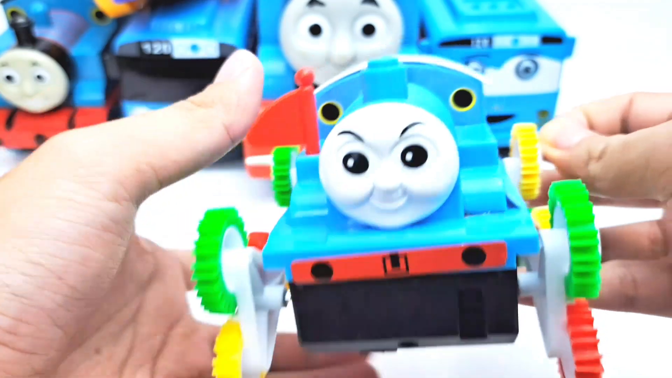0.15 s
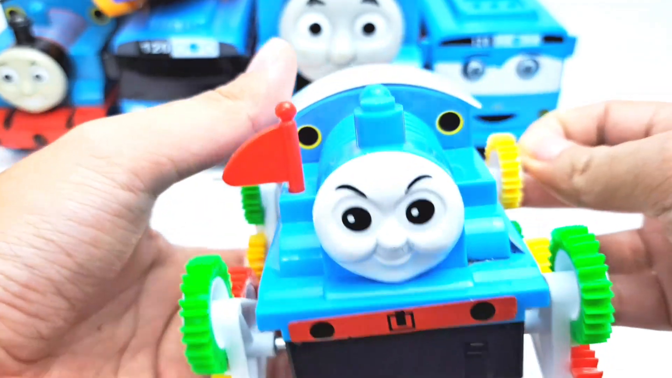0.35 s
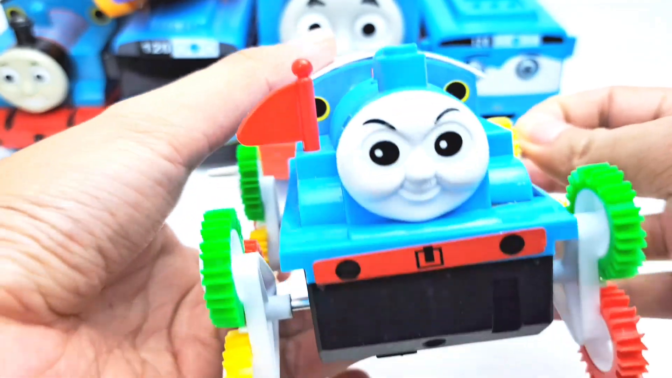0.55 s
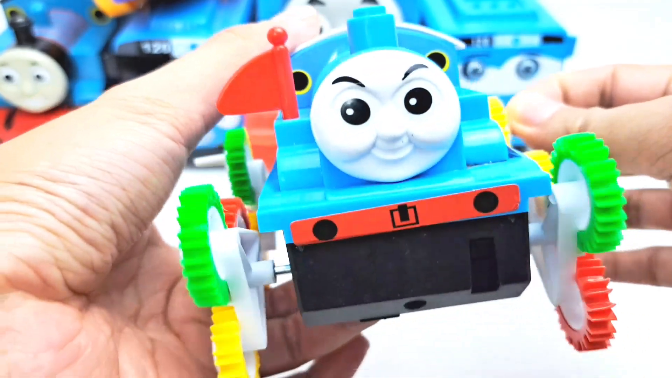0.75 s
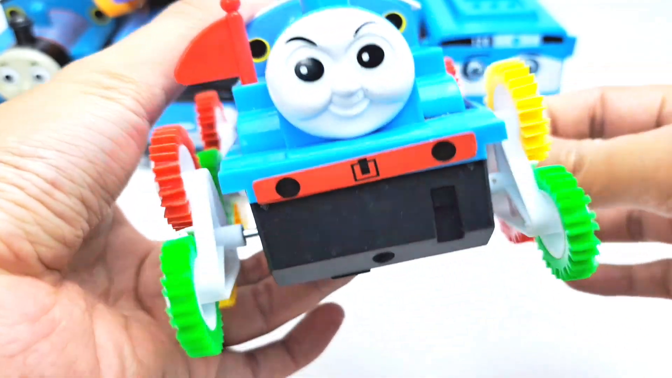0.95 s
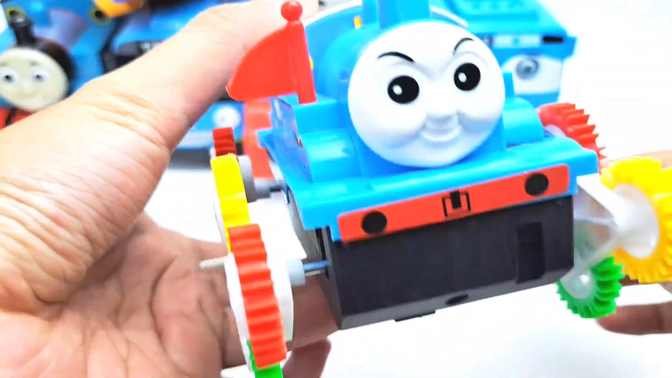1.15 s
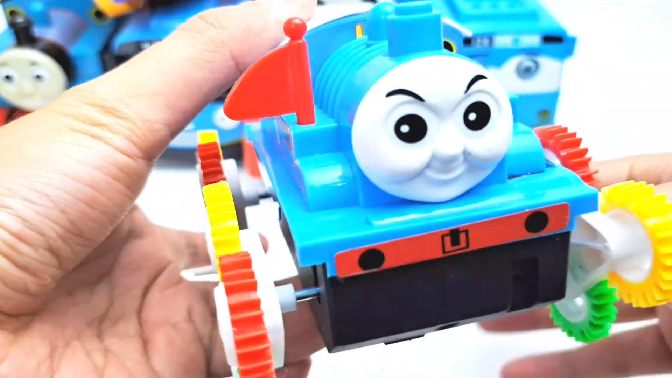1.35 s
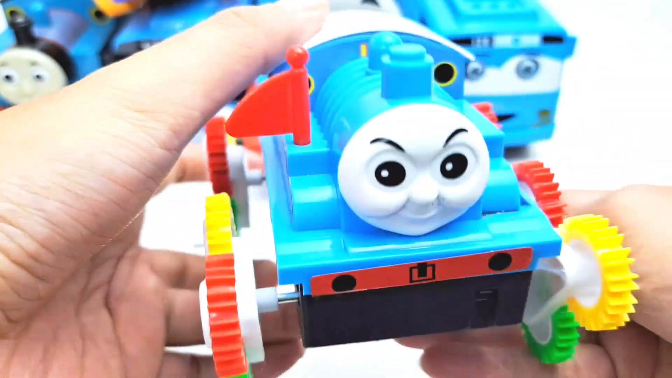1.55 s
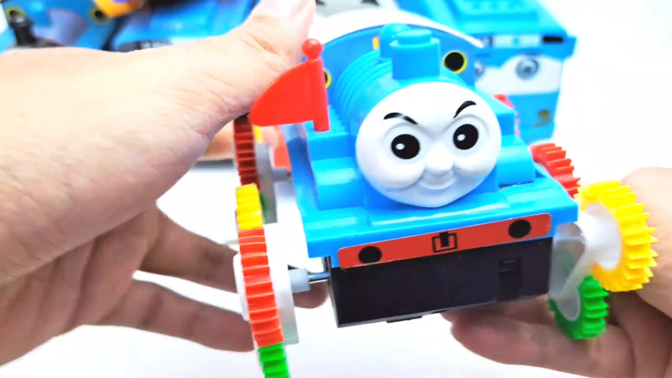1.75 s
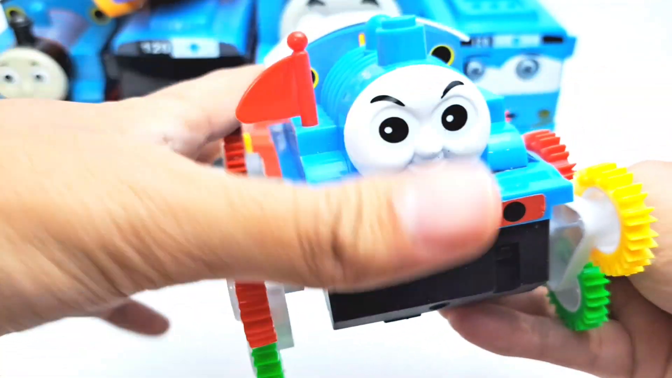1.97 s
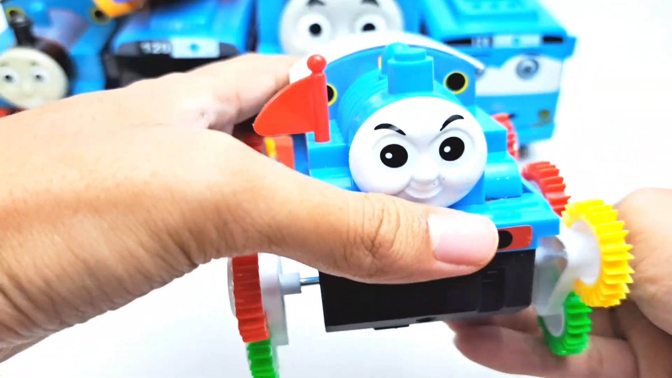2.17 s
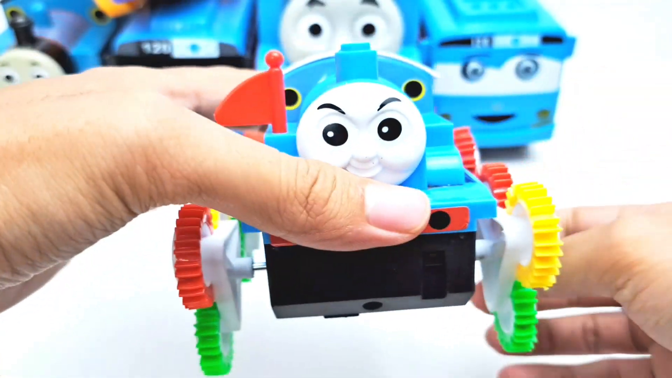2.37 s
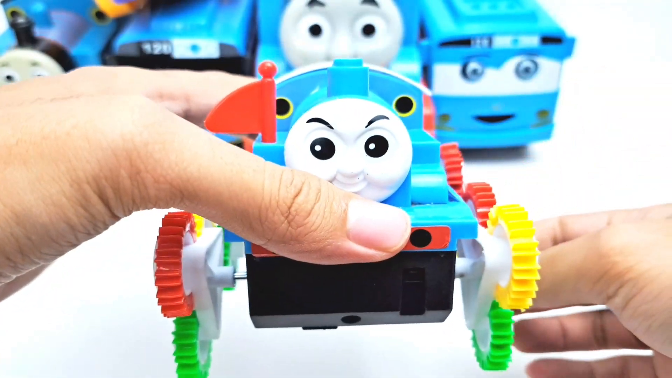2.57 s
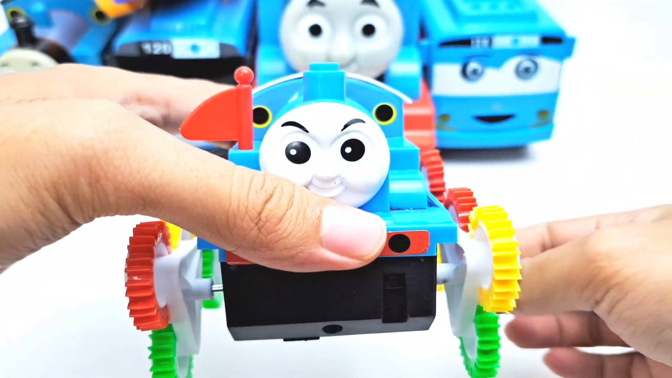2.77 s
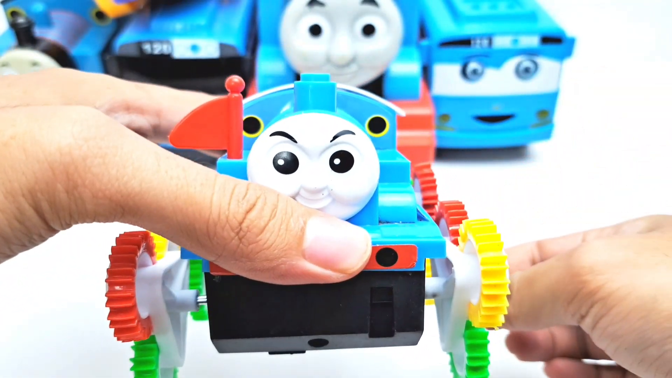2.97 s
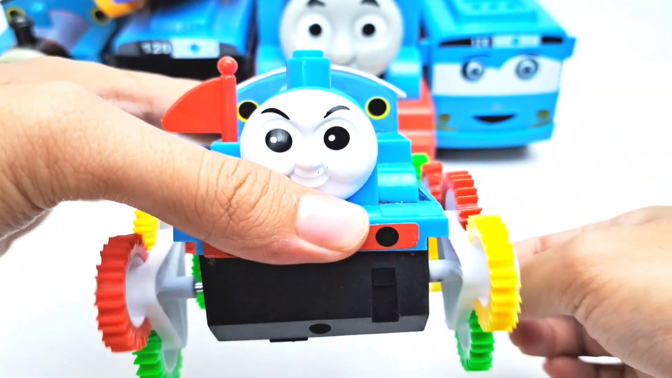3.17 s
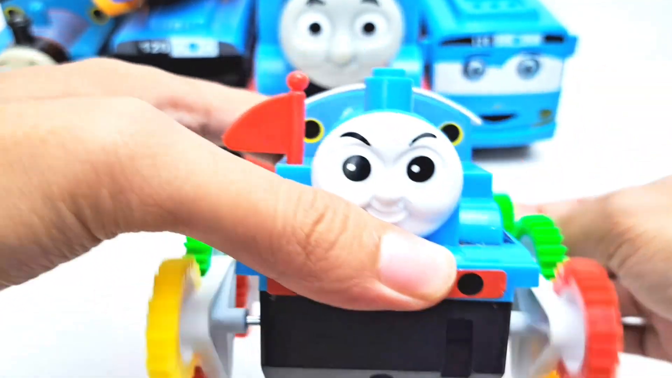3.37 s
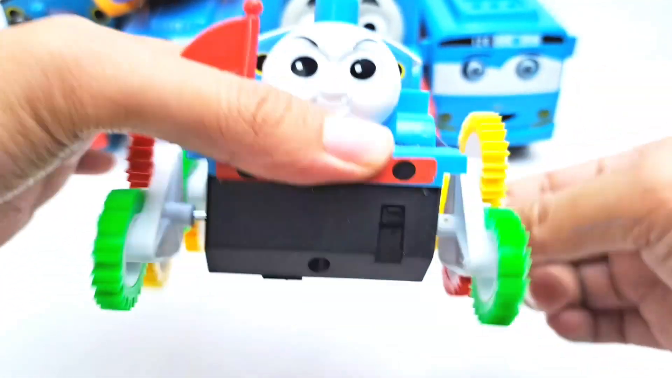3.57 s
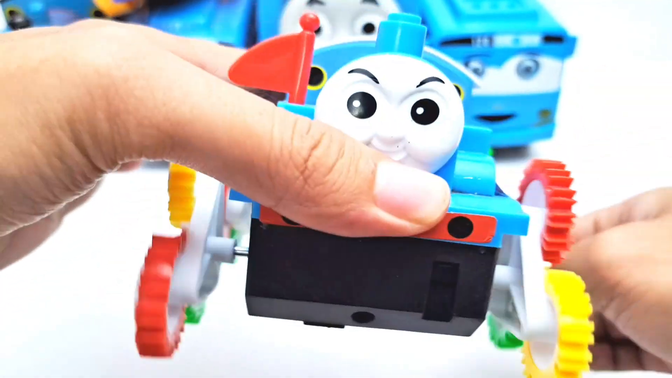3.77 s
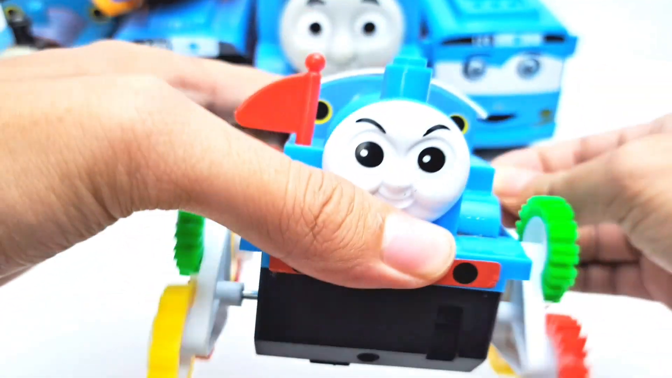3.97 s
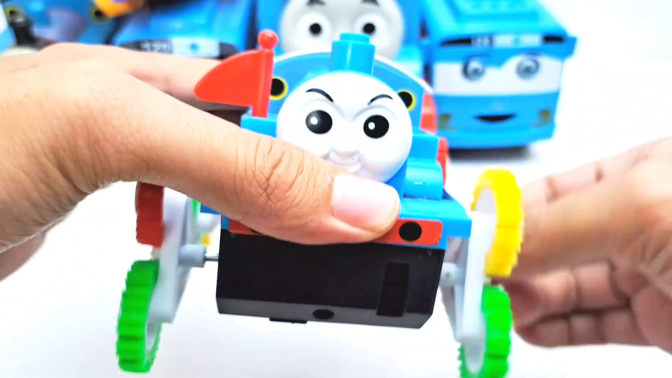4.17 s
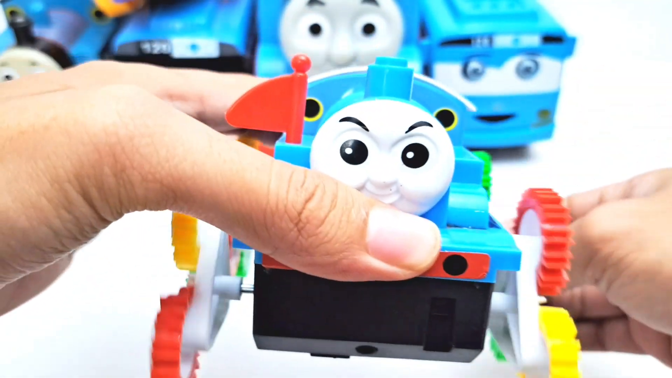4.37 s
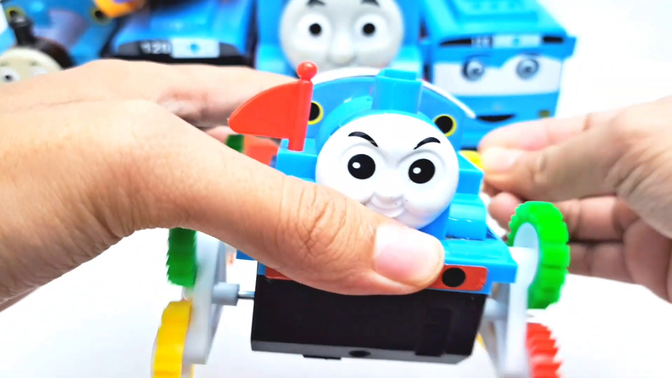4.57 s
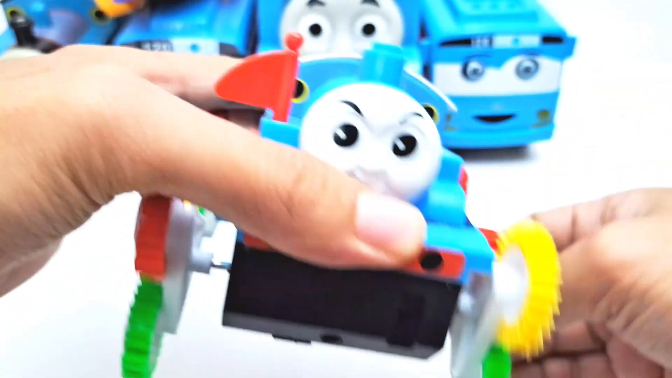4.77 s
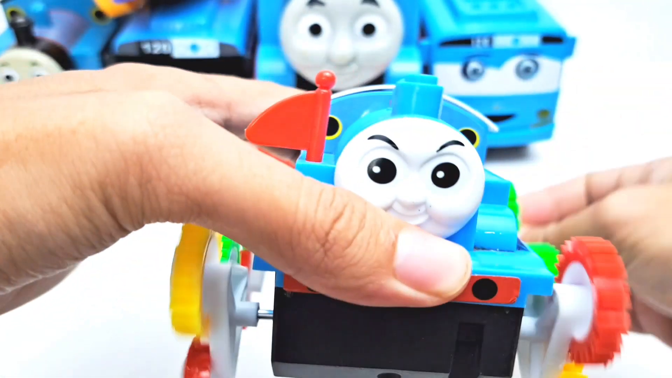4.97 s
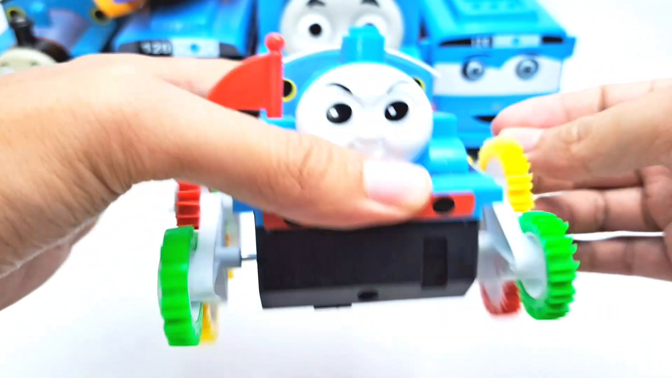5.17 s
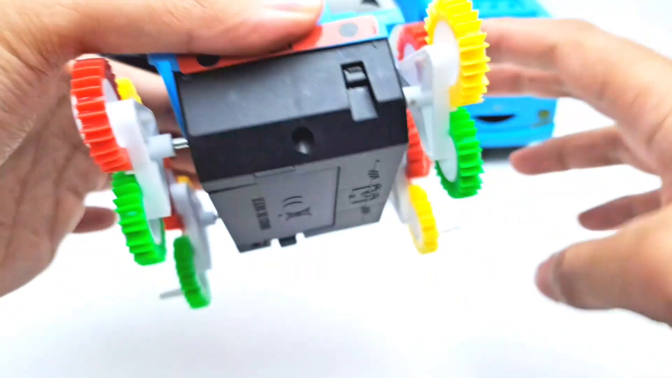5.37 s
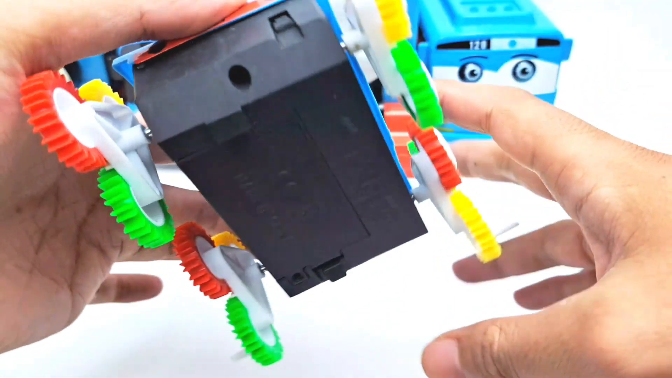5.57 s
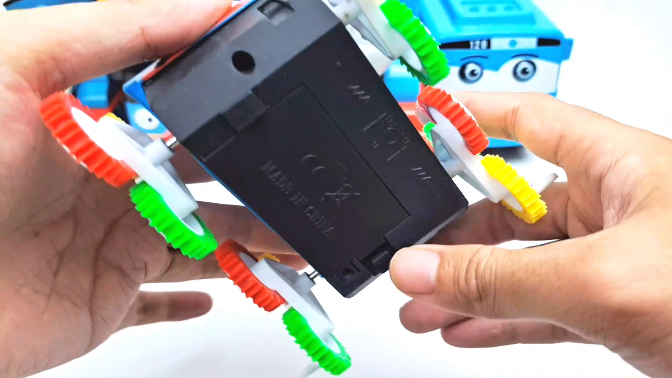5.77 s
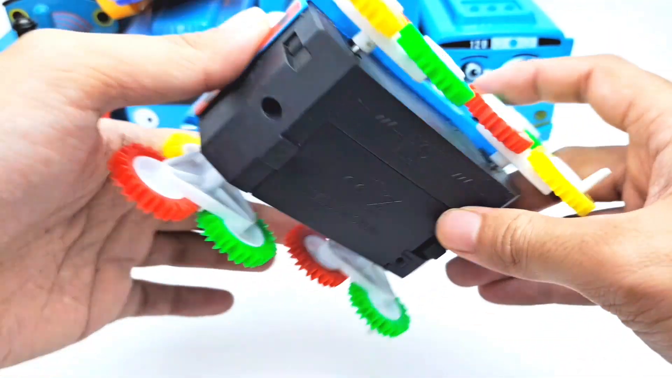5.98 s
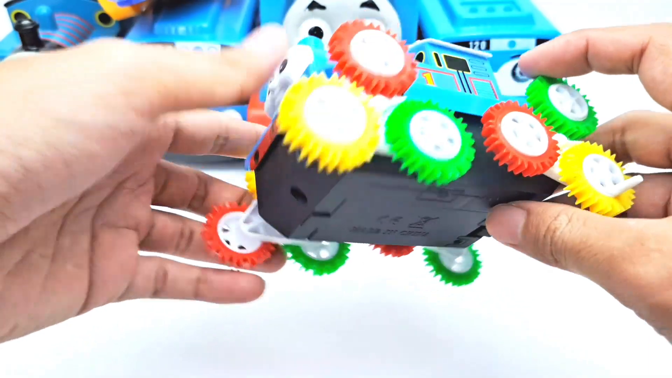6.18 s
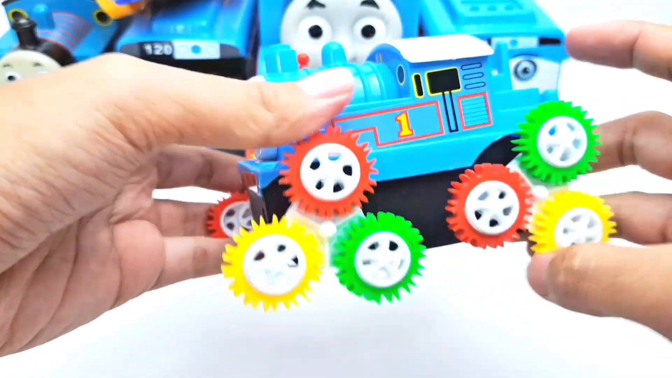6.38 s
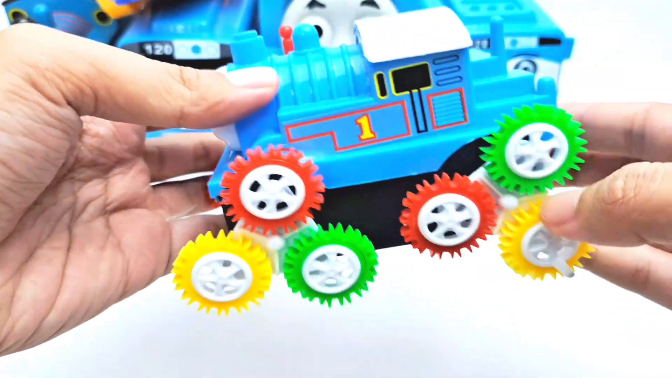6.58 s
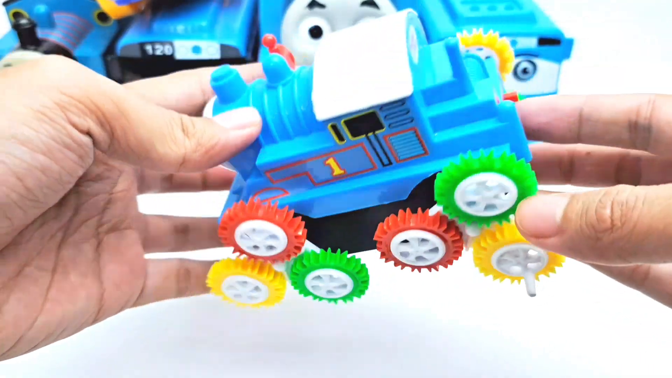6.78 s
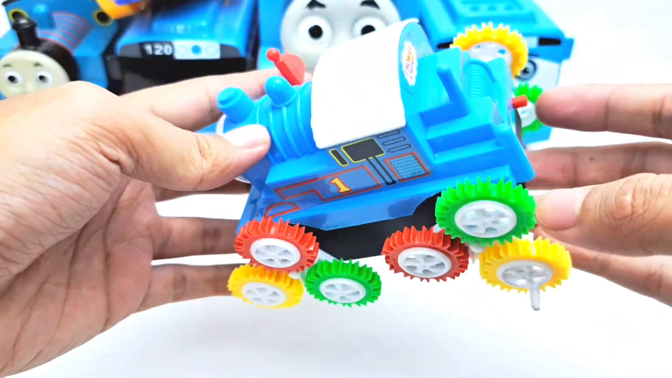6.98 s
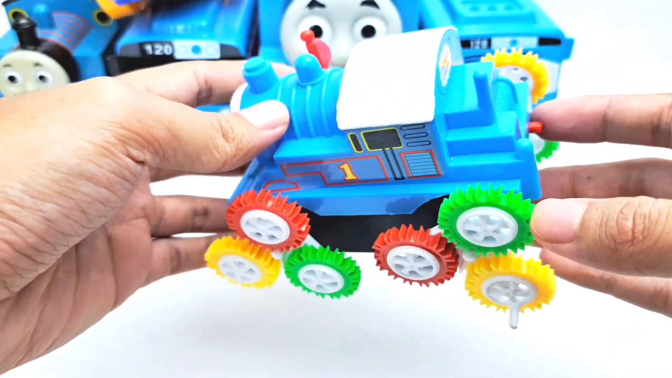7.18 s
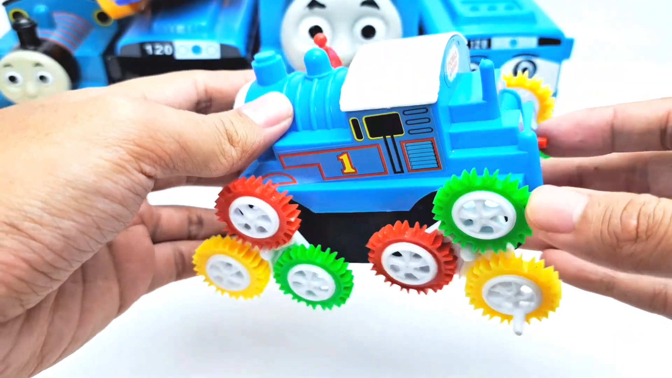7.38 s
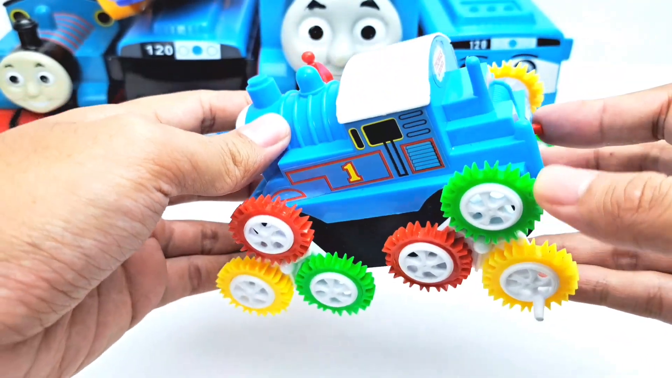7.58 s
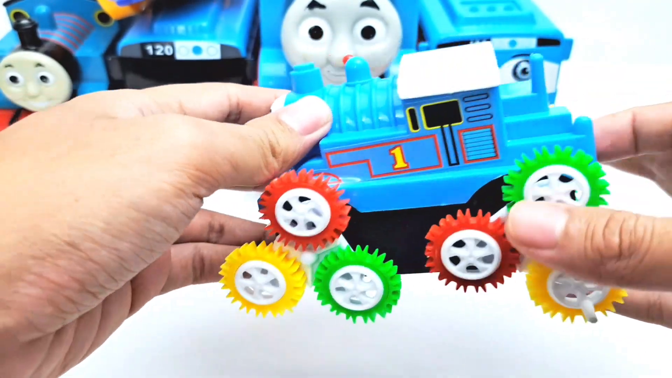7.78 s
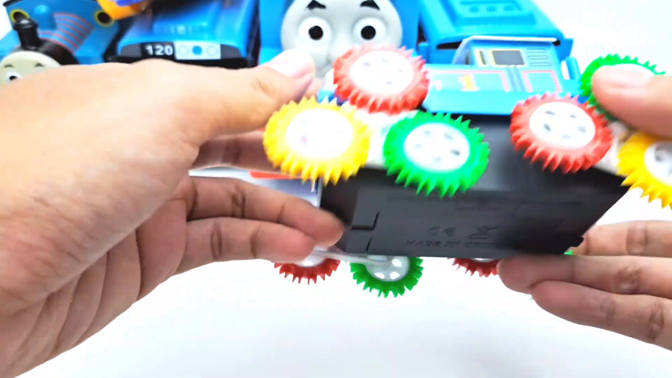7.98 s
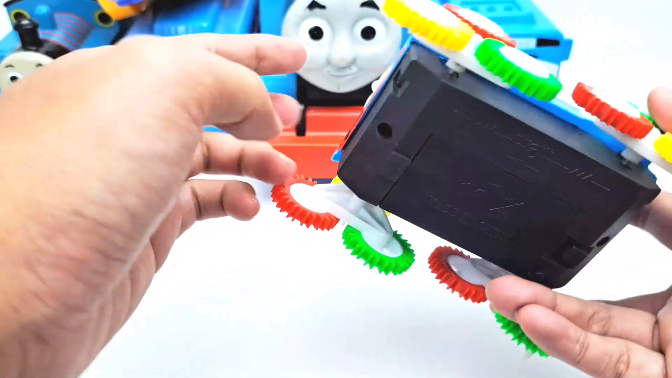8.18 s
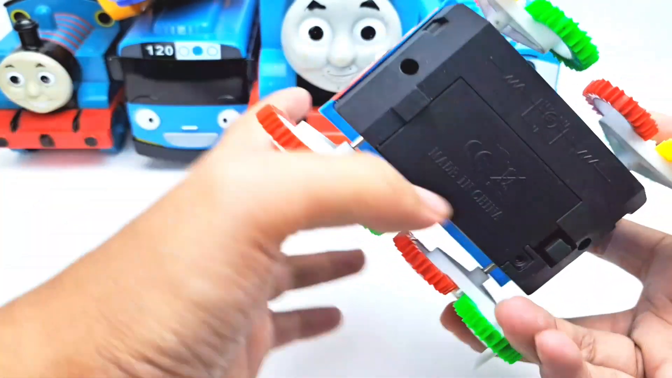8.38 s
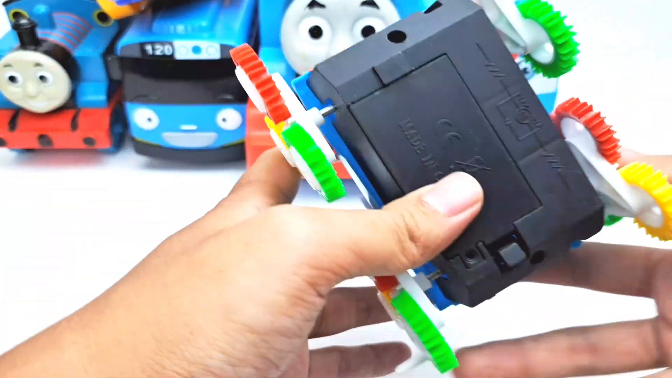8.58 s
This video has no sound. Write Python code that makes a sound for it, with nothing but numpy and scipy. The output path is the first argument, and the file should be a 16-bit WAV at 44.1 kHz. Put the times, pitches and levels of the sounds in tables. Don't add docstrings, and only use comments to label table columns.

```python
import sys
import numpy as np
from scipy import signal
from scipy.fft import rfft, irfft, next_fast_len
from scipy.io import wavfile
from scipy.ndimage import uniform_filter1d

SR = 44100
rng = np.random.default_rng(int(sys.argv[2]) if len(sys.argv) > 2 else 0)


def store_wav(level_fs):
    pcm = np.round(np.clip(np.atleast_2d(level_fs), -1, 1) * 32767)
    wavfile.write(sys.argv[1], SR, pcm.T.astype(np.int16))


def volts_from_decibels(level):
    exponent = np.asarray(level, float) / 20
    return 10 ** exponent


N = 380891
STEP = 64
FIRST_TURN_S = 1.3

# f/Hz, width/Hz, level/dB, left minus right/dB
SHELL = [(600, 380, -22.5, 0), (719, 50, -11.5, -1.5), (860, 90, -17.5, -2), (1080, 33, 3, -2),
         (1250, 13, -24, -0.5), (1546.5, 170, -3, -7), (1700, 60, -9, -2), (1830, 94, 0.5, 3.5),
         (2100, 120, -4.5, -3), (2271, 55, 4.5, -5.5), (2524, 420, -6.5, 1), (3397, 680, -14, -4),
         (4044, 380, -9.5, -5.5), (4434, 350, -5.5, -3.5), (4814, 270, -7.5, -1), (5620, 330, -16.5, 0.5),
         (6530, 550, -12, -2), (7430, 770, -15.5, 0), (12370, 3600, -29, 4)]
# f/Hz, level per Hz/dB
SKIN = [(500, -21), (1000, 7.5), (2200, 9), (3000, 0.5), (6000, 1), (9000, -11.5), (14000, -16),
        (16000, -17)]


def unit(x):
    return x / np.sqrt(np.mean(x ** 2))


def even(x):
    return x / np.sqrt(uniform_filter1d(np.mean(x ** 2, axis=0), size=5000))


def colour(x, points):
    hz, db = np.transpose(points)
    length = x.shape[-1]
    size = next_fast_len(length)
    f = np.maximum(np.arange(size // 2 + 1) * SR / size, 1)
    gain = volts_from_decibels(np.interp(np.log(f), np.log(hz), db))
    return irfft(rfft(x, size) * gain, size)[..., :length]


def split(x):
    lows = []
    for hz in (1300, 2000, 3000):
        lowpass = signal.butter(4, hz, fs=SR, output="sos")
        lows.append(signal.sosfiltfilt(lowpass, x))
    a, b, c = lows
    return unit(a), unit(b - a), unit(c - b), unit(x - c)


def resonance(hz, width):
    return np.exp((2j * np.pi * hz - np.pi * width) / SR)


def sides(pan_db):
    return volts_from_decibels(np.array([pan_db, -pan_db]) / 2)


def walk(rate):
    k = int(SR / rate)
    held = np.repeat(rng.standard_normal(N // k + 1), k)
    return unit(uniform_filter1d(held, k)[:N])


def grit(rate, spread_db):
    hit = rng.random((3, N)) < rate / SR
    size = np.minimum(rng.exponential(size=(3, N)), 3)
    return unit(hit * rng.standard_normal((3, N)) * volts_from_decibels(spread_db * size))


def stretch(control):
    return np.interp(np.arange(N) / STEP, np.arange(len(control)), control)


def ramp(start, end, rise_db_s, fall_db_s):
    t = np.arange(N // STEP + 1) * STEP / SR
    return -rise_db_s * np.maximum(start - t, 0) - fall_db_s * np.maximum(t - end, 0)


def spin():
    # grip t/s, full speed t/s, let go t/s, level at grip/dB, level at full speed/dB
    pushes = [
        (0.848, 1.119, 1.1905, -51.5, -32),
        (3.297, 3.418, 3.848, -41.5, -28.5),
        (3.799, 4.066, 4.236, -36, -27.5),
        (4.334, 4.68, 4.843, -34.5, -27.5),
        (4.927, 5.152, 5.318, -34.5, -27),
        (5.458, 5.5, 5.6, -46, -49.5),
    ]
    stopped = (True, False, False, False, False, True)
    grip_db_s, coast_db_s, stop_db_s = 400, 85, 352
    t = np.arange(N // STEP + 1) * STEP / SR
    levels = []
    for (grip, full, off, grip_db, full_db), stop in zip(pushes, stopped):
        speed_up = np.interp(t, [grip, full], [grip_db, full_db])
        levels.append(speed_up + ramp(grip, off, grip_db_s, stop_db_s if stop else coast_db_s))
    levels = np.array(levels)
    grip, off = np.transpose(pushes)[[0, 2]][:, levels.argmax(axis=0)]
    levels[:-1] += ramp(0, pushes[-1][2], 0, stop_db_s)
    done = uniform_filter1d(np.clip((t - grip) / (off - grip), 0, 1), size=40)
    return stretch(levels.max(axis=0)), stretch(done)


def shell(force, patchy_db):
    like_sides = [.7, .9, .9, .6, .6, .6, .9, 1, .7, 1, .7, .6, .1, .7, .5, .4, .2, .5, .2]
    left_lead = [.6, .2, .3, -.8, -.1, .1, -2.4, -1.6, 1.4, 1.2, -1.4, 2.6, -.9, 1.2, 2.1, .2, -2.9, 1.7,
                 -.2]
    drift, squeeze = 0.012, 0.02
    out, done = np.zeros((2, N)), spin()[1]
    for (hz, width, db, pan_db), like, lead in zip(SHELL, like_sides, left_lead):
        drive = np.sqrt(like) * force[0] + np.sqrt(1 - like) * force[1:]
        ring = signal.lfilter([1], [1, -resonance(hz, width)], drive)
        bend = (hz > 1300) * (drift * walk(12) + squeeze * (done - 0.5))
        ring *= np.exp(2j * np.pi * hz / SR * np.cumsum(bend))
        ring *= np.exp(1j * np.array([[lead], [0]]))
        level = volts_from_decibels(db + patchy_db * walk(22)) * np.sqrt(width)
        out += level * unit(ring.imag) * sides(pan_db)[:, None]
    return unit(out)


def chatter():
    # t/s, surge level/dB
    catches = [(0.897, 3), (1.029, 3), (1.092, 2.6), (1.129, 9.5), (1.184, 7), (3.268, 0.3), (3.305, 1),
               (3.354, 3.5), (3.399, 1.5), (3.432, -1.5), (3.479, 0.4), (3.503, 0.3), (3.558, 0),
               (3.599, -0.4), (3.673, -1.2), (3.685, 1.7), (3.7, 3), (3.73, 1.5), (3.782, -2),
               (3.842, -0.5), (3.877, 3.5), (3.945, 2.2), (3.986, 2.1), (4.025, -0.4), (4.064, 2),
               (4.086, -1), (4.127, 0.8), (4.245, 4), (4.272, -0.2), (4.3, 0), (4.347, 2.5), (4.393, 2.5),
               (4.438, 1), (4.482, 6), (4.531, 1), (4.615, 1.4), (4.683, 2.5), (4.703, -5), (4.736, 3.1),
               (4.778, 2), (4.834, -2.5), (4.852, 2), (4.897, 6), (4.92, -0.3), (4.949, 4), (5.03, -1.7),
               (5.109, 3.2), (5.134, 0), (5.158, 0), (5.2, 0.5), (5.215, 1), (5.243, 3.5), (5.312, 2.5),
               (5.36, 3.5), (5.38, 4.5), (5.41, -1.2), (5.472, 1), (5.487, -2), (5.507, 1), (5.542, 2),
               (5.564, 2.5)]
    gaps = [3.322, 3.379, 3.421, 3.72, 3.922, 4.267, 4.316, 4.362, 4.472, 4.82, 4.877, 4.933, 4.972, 5.405]
    # f/Hz, level per Hz/dB
    rattle_tone = [(300, -55), (600, -21.5), (900, 1.5), (1600, -0.5), (2300, 5.5), (3100, -2.5),
                   (4500, -9.5), (7500, -17), (9800, -39), (13000, -23.5), (14300, -31.5), (15500, -41.5)]
    surge = np.zeros(N)
    for s, db in catches:
        surge[int(s * SR)] = volts_from_decibels(db + 5.5)
    t = np.arange(2048) / SR
    catch_shape = (1 - np.exp(-t / 0.0047)) * np.exp(-t / 0.0052)
    surge = signal.fftconvolve(surge, catch_shape)[:N]
    control_t = np.arange(N)[::STEP] / SR
    slack = 1 - 0.55 * sum(np.exp(-((control_t - s) / 0.0065) ** 2) for s in gaps)
    unsteady = volts_from_decibels(0.6 * walk(45) + 1.6 * walk(260))
    force = stretch(slack) * grit(7000, 1.5) * unsteady * (1 + surge)
    rattle = unit(colour(force[1:] + 0.1 * force[0], rattle_tone))
    rattle_db = np.where(np.arange(N) < FIRST_TURN_S * SR, 1, -7)
    return [even(part) for part in split(shell(force, 3.3) + volts_from_decibels(rattle_db) * rattle)]


def gears(deep, middle, upper, bright):
    db, done = spin()
    palm = np.arange(N) < FIRST_TURN_S * SR
    deep_db = -7 + (-11.5 + 7) * done + 8 * palm
    upper_db = 2 + (-13 - 2) * done - 0.5 + 2 * palm * (1.5 - done)
    bright_db = 5 + (-1 - 5) * done + 3 * palm
    deep_db += 0.35 * np.clip(db + 29, -6, 0)
    bright_db += 0.19 * np.minimum(db + 33.5, 0)
    parts = middle + volts_from_decibels(deep_db) * deep + volts_from_decibels(upper_db) * upper + volts_from_decibels(bright_db) * bright
    shaded = colour(parts, [(7000, -1), (8800, -0.5)])
    return volts_from_decibels(db + 1.0) * sides(-2.5)[:, None] * shaded


def whine():
    # start t/s, end t/s, start f/Hz, end f/Hz, level/dB
    glides = [(1.09, 1.158, 2080, 2170, -29.5), (3.33, 3.428, 2250, 2660, -27.5),
              (3.36, 3.436, 1750, 1908, -36.5), (3.8, 3.911, 2060, 2343, -38),
              (3.96, 4.151, 2205, 2300, -23), (4.38, 4.537, 2100, 2410, -39.5),
              (4.63, 4.729, 2148, 2312, -14), (4.92, 4.982, 2147, 2470, -34),
              (5.06, 5.221, 2052, 2434, -21.5), (3.55, 3.77, 1790, 1860, -31),
              (4.446, 4.619, 2240, 2650, -32.5), (5.446, 5.636, 1910, 1832, -44.5),
              (3.4, 3.622, 2280, 2156, -31), (5.2, 5.433, 1810, 1880, -32), (4.5, 4.699, 1515, 1574, -36),
              (5.3, 5.547, 2265, 2230, -38)]
    out = np.zeros((2, N))
    wobble, flutter = 1 + 0.0089 * walk(150), volts_from_decibels(1.3 * walk(60))
    for start, end, hz0, hz1, db in glides:
        a, b = int(start * SR), int(end * SR)
        phase = 2 * np.pi * np.cumsum(np.linspace(hz0, hz1, b - a) * wobble[a:b]) / SR
        tone = np.sin(phase + np.array([[1.2], [0]]))
        out[:, a:b] += volts_from_decibels(db) * np.hanning(b - a) * flutter[a:b] * tone
    return out * sides(-4.5)[:, None]


def fingers(deep, middle, upper, bright):
    # start t/s, length t/s, shell level/dB, skin hiss level/dB
    strokes = [(0.0, 0.017, -49.5, -55.5), (0.094, 0.08, -50, -58), (0.503, 0.07, -66, -67),
               (0.655, 0.017, -84, -73), (1.273, 0.0087, -71, -68), (1.34, 0.074, -61, -64),
               (1.554, .04, -52.5, -72), (1.618, 0.053, -57, -49.5), (1.722, 0.028, -52, -56.5),
               (1.892, 0.023, -59.5, -56), (2.16, 0.056, -64.5, -65), (2.37, 0.055, -67.5, -63.5),
               (5.775, .02, -69.5, -107.5), (6.424, .03, -68, -67), (5.97, .04, -64, -80.5),
               (6.04, 0.015, -64, -60), (6.174, 0.085, -60, -62.5), (6.373, 0.036, -50.5, -54.5),
               (6.5, 0.063, -53, -60.5), (6.675, 0.09, -52.5, -63), (6.883, 0.037, -60.5, -65.5),
               (7.192, 0.077, -62, -62), (7.446, 0.02, -60, -67.5), (7.805, 0.026, -54, -71),
               (7.904, 0.032, -51, -68), (7.973, 0.021, -52, -53), (8.175, .04, -64.5, -81),
               (8.55, 0.066, -64.5, -67)]
    touch_db_s, lift_db_s = 201.5, 184
    shapes = [ramp(s, s + length, touch_db_s, lift_db_s) for s, length, _, _ in strokes]
    db = stretch(np.max([row[2] + shape for row, shape in zip(strokes, shapes)], axis=0))
    hiss_db = stretch(np.max([row[3] + shape for row, shape in zip(strokes, shapes)], axis=0))
    jolts = np.abs(grit(110, 2.5)[0])
    slips = unit(0.13 + signal.lfilter([0.01], [1, -np.exp(-1 / (0.007 * SR))], jolts))
    hiss = unit(colour(rng.standard_normal((2, N)), SKIN)) + 1.3 * bright
    murmur = deep * volts_from_decibels(3 * walk(25))
    murmur = murmur + 0.6 * middle * volts_from_decibels(3 * walk(25))
    murmur = murmur + 0.7 * upper * volts_from_decibels(3 * walk(25))
    return slips * sides(0.91)[:, None] * (volts_from_decibels(db - 4.5) * murmur + volts_from_decibels(hiss_db - 7.5) * hiss)


def rubs():
    # start t/s, length t/s, panel f/Hz, width/Hz, level/dB
    drags = [(.21, 0.19, 2000, 405, -79), (0.466, 0.052, 2220, 300, -68), (0.603, 0.072, 2100, 700, -72.5),
             (3.13, 0.094, 4140, 500, -65.5), (3.195, 0.085, 1930, 1000, -53.5),
             (5.453, 0.13, 1890, 150, -46), (5.59, 0.05, 1900, 600, -57.5), (6.363, .08, 900, 500, -62),
             (7.024, .04, 1810, 900, -69.5), (7.101, .07, 2270, 300, -69), (7.208, 0.076, 850, 350, -53),
             (7.215, 0.061, 2300, 250, -63.5), (7.398, 0.055, 5370, 1485, -71.5),
             (7.44, 0.058, 1130, 400, -62), (7.56, 0.074, 1200, 496, -70), (8.416, .06, 1503, 1210, -69),
             (8.557, 0.04, 11130, 5000, -60.5), (4.303, .06, 708, 80.5, -43), (1.52, 0.18, 2180, 900, -70),
             (6.01, 0.054, 1560, 1200, -64)]
    out, noise, uneven = np.zeros((2, N)), rng.standard_normal((3, N)), 1.7 * walk(90)
    for s, length, hz, width, db in drags:
        a, b = int((s - 0.03) * SR), min(int((s + length + 0.1) * SR), N)
        pole = resonance(hz, width)
        friction = noise[0, a:b] + min(hz / 1500, 2) * noise[1:, a:b]
        hum = signal.lfilter([1], np.poly([pole, pole]), friction).imag
        shape_db = stretch(ramp(s, s + length, 1500, 400))[a:b]
        out[:, a:b] += volts_from_decibels(db + uneven[a:b] + shape_db) * unit(hum)
    return out


def ticks():
    # t/s, peak level/dB, ring f/Hz, crack level/dB
    case_ticks = [(0.635, -55, 703, -28), (1.279, -31.5, 880, -34), (2.343, -56.5, 778, -17.5),
                  (2.364, -40, 858, -16), (6.233, -24.5, 1070, -12.5), (6.387, -33, 716, -11),
                  (6.513, -31, 708, -28), (6.617, -43, 728, -29), (6.756, -41.5, 744, 1),
                  (6.78, -36.5, 733, -16), (7.017, -39.5, 713, -38), (7.276, -39, 854, -7),
                  (7.692, -42, 726, -28), (7.703, -39, 703, -29), (7.755, -32.5, 703, -18.5),
                  (8.007, -31.5, 710, -21), (7.29, -34.5, 860, -42), (2.68, -56.5, 902, -5),
                  (5.952, -41, 1115, -17), (6.435, -36.5, 1120, -26.5), (6.568, -34.5, 1700, -19),
                  (7.482, -39.5, 1125, -25.5), (8.473, -51, 1810, -30.5)]
    # t/s, peak level/dB, ring f/Hz, crack level/dB
    axle_ticks = [(0.058, -30, 1010, -33), (0.474, -34.5, 1170, -17.5), (1.408, -32, 1250, -4.5),
                  (1.516, -42, 1240, -2.5), (1.928, -35, 1110, -1.5), (2.23, -43, 1030, -17.5),
                  (2.252, -39, 1030, -4), (2.388, -19.5, 1390, -26.5), (5.787, -35, 1100, -40),
                  (6.001, -31, 1090, -26), (6.031, -37.5, 1280, -15), (6.223, -37, 1120, -25),
                  (6.549, -28, 1111, -18), (6.648, -28, 1170, -5), (6.702, -26, 1080, -15),
                  (6.895, -37, 1105, -12.5), (7.097, -34, 1200, -8.5), (7.2, -27.5, 1160, -8.5),
                  (7.468, -39.5, 1090, -32), (7.543, -35, 1120, -44), (7.799, -20, 1080, -25),
                  (7.854, -28.5, 1060, -2), (7.908, -25.5, 1100, -39), (7.936, -34, 1080, -24),
                  (7.978, -23.5, 1250, -25), (8.081, -38.5, 1080, -0.5), (8.148, -43.5, 1230, -11),
                  (8.298, -32, 1100, -37), (8.452, -48, 1140, -30), (8.561, -34.5, 1080, 1.5)]
    # t/s, peak level/dB, ring f/Hz, crack level/dB
    wheel_ticks = [(0.038, -32, 1850, -5.5), (0.095, -49, 1600, -10), (0.134, -21, 1530, -12.5),
                   (0.194, -26, 2100, -14), (0.552, -34.5, 1880, -16), (1.362, -33.5, 2270, -14),
                   (1.553, -28, 2170, -19), (1.598, -28, 1960, -13), (1.638, -44, 1850, -17),
                   (1.662, -35, 2250, -15), (1.693, -32, 2180, -18), (1.709, -22.5, 2350, -11),
                   (1.754, -33, 1830, -29), (1.857, -32.5, 2350, -7.5), (1.923, -42, 1370, 0),
                   (2.094, -38, 2260, -7.5), (2.818, -48, 1994, -12.5), (3.129, -33, 2190, -5.5),
                   (5.718, -31, 2100, -17), (6.335, -38.5, 1830, -17), (6.357, -37, 1660, -15),
                   (6.533, -33.5, 1690, -15), (6.687, -21.5, 1567, -6.5), (7.77, -31.5, 2450, -4.5),
                   (7.82, -22, 1936, -7.5), (7.892, -26.5, 1776, -7.5), (7.973, -19.5, 2550, -12),
                   (8.168, -37, 2340, -5.5), (8.518, -49, 1830, -22), (8.546, -35, 1680, -29),
                   (0.461, -37, 1980, -27), (0.074, -43, 4300, -24), (0.515, -54, 4300, -27),
                   (1.38, -49, 2300, -10), (1.645, -38, 2400, -9), (1.932, -36, 1470, -6.5),
                   (2.27, -43.5, 2200, -10.5), (5.655, -43, 1920, -20.5), (6.115, -48, 2000, -14.5),
                   (6.485, -45, 2300, -5), (7.81, -33, 1500, -10.5), (8.024, -37, 2400, -6)]
    # left minus right dB, contact ms
    seats = ((case_ticks, (1.2, 2.2)), (axle_ticks, (-0.65, 2.2)), (wheel_ticks, (-3.5, 1.9)))
    rows = [tuple(row) + seat for part, seat in seats for row in part]
    size = 3072
    out, t = np.zeros((2, N + size)), np.arange(size) / SR
    hz, width = np.transpose(SHELL)[:2]
    noise = rng.standard_normal((3, N + size))
    crack = sum(split(colour(noise[1:], SKIN))[2:])
    bumps = np.tile(volts_from_decibels(7.2 * walk(500)), 2)
    chances = rng.random((len(rows), 3, len(hz) + 1))
    for (s, db, ring_hz, crack_db, pan_db, ms), luck in zip(rows, chances):
        pan_db = pan_db + 14.5 * (luck[2, 0] - 0.5)
        ms = ms * volts_from_decibels(8.5 * (luck[2, 1] - 0.5))
        f, a = np.append(hz, ring_hz), int(s * SR)
        b = a + size
        near = volts_from_decibels(-7.5 * np.abs(np.log2(f / ring_hz)) - 14.6 * luck[0])
        fade = np.exp(-np.outer(np.append(width + 70, 220), t) * 3.6) * np.minimum(t * ring_hz, 1)
        lead = luck[1] * np.minimum(f / 1540, 1)
        cycles = np.outer(f, t)
        ring = np.array([near @ (fade * np.sin(2 * np.pi * (cycles + k * lead[:, None]))) for k in (0, 1)])
        contact = (1 - np.exp(-t / 0.0018)) * np.exp(-t * 1000 / max(ms, 0.5)) * bumps[a:b]
        body = signal.fftconvolve(ring, [contact * noise[0, a:b]], axes=1)[:, :size]
        snap = (contact + 1.5 * np.exp(-t / 0.0013) + 0.23 * np.exp(-t / 0.027)) * crack[:, a:b]
        tick = body / np.abs(body).max() + volts_from_decibels(crack_db + 7) * snap / np.abs(snap).max()
        out[:, a:b] += volts_from_decibels(db - 1.5) * sides(pan_db)[:, None] * tick
    return out[:, :N]


def room(x, t60, db):
    t = np.arange(int(0.3 * SR)) / SR
    tail = rng.standard_normal((2, len(t))) * volts_from_decibels(-60 * t / t60) * (t > 0.003)
    tail = colour(tail, [(500, 2.0), (1200, -7.0), (5000, -9), (15000, -6.5)])
    tail /= np.sqrt(np.sum(tail ** 2, axis=1, keepdims=True))
    return volts_from_decibels(db) * signal.fftconvolve(x.mean(axis=0, keepdims=True), tail, axes=1)[:, :N]


def rumble():
    # f/Hz, level per Hz/dB
    floor_tone = [(18, -60), (30, -27), (81, -5.5), (153, -16), (170, -18.5), (210, -18), (295, -27.5),
                  (374, -23), (404, -31.5), (760, -35), (3490, -64), (13000, -61), (16000, -74.5)]
    # f/Hz, width/Hz, level/dB
    drones = [
        (47.95, 2.7, -51.5),
        (76.25, 4.5, -52),
        (98.3, 6.7, -56),
        (137.6, 24, -64.5),
    ]
    # t/s, level/dB
    swell = [(0, -51.5), (1.1, -46.5), (2.7, -61.5), (3.8, -47), (5, -50.5), (5.8, -64.5), (6.8, -49),
             (8.64, -50.5)]
    t = np.arange(N) / SR
    mid, side = colour(rng.standard_normal((2, N)), floor_tone)
    side = colour(side, [(60, -24.0), (125, -11), (300, -8.5), (1000, 2.5), (3000, -0.5)])
    floor = volts_from_decibels(-45.5 - 3.5) * (mid + side * np.array([[1], [-1]])) / np.std(mid)
    swell_db = np.interp(t, *np.transpose(swell))
    swell_db -= swell_db.mean()
    for k, (hz, width, db) in enumerate(drones):
        pole = resonance(hz, width)
        drone = unit(signal.lfilter([1], np.poly([pole, pole]), rng.standard_normal(N)).imag)
        drone = unit(drone + 1.3 * np.sin(2 * np.pi * hz * t + 0.7 * walk(width / 2)))
        floor = floor + volts_from_decibels(db + swell_db * (k == 0)) * drone
    return floor


def scene():
    # f/Hz, side level/dB
    ports = [(250, -8), (600, -6.5), (1000, -1), (1500, 0.5)]
    parts = chatter()
    toy = gears(*parts) + whine() + fingers(*parts) + rubs() + ticks()
    toy = toy + room(toy, 0.13, -6.0)
    toy = colour(toy, [(250, -13.5), (480, -7.5), (600, -2.5), (700, 0.0)])
    mid, side = toy.mean(axis=0), colour((toy[0] - toy[1]) / 2, ports)
    return np.array([mid + side, mid - side]) + rumble()


def top_cut(x):
    return signal.sosfilt(signal.butter(12, 15750, fs=SR, output="sos"), x)


def record(dry):
    lowpass = signal.butter(10, 15300, fs=SR, output="sos")
    mix = signal.sosfilt(lowpass, np.tanh(dry))
    return top_cut(mix)


dry = scene()
out = record(dry)
store_wav(out)
```